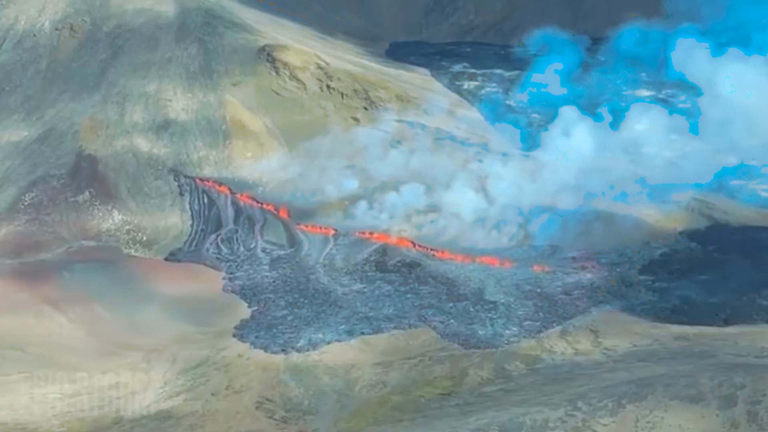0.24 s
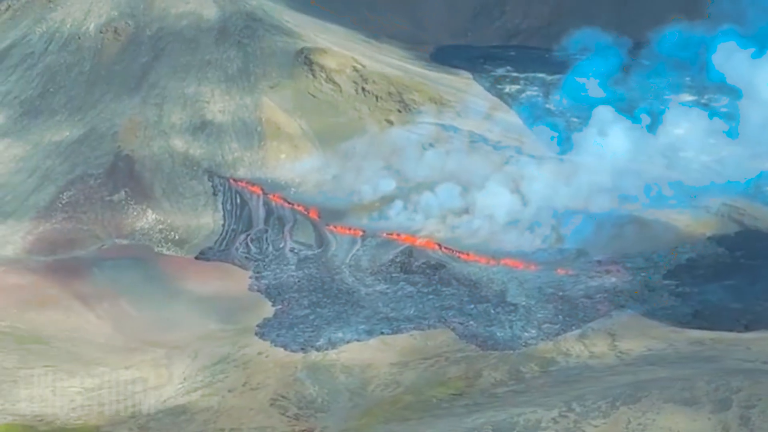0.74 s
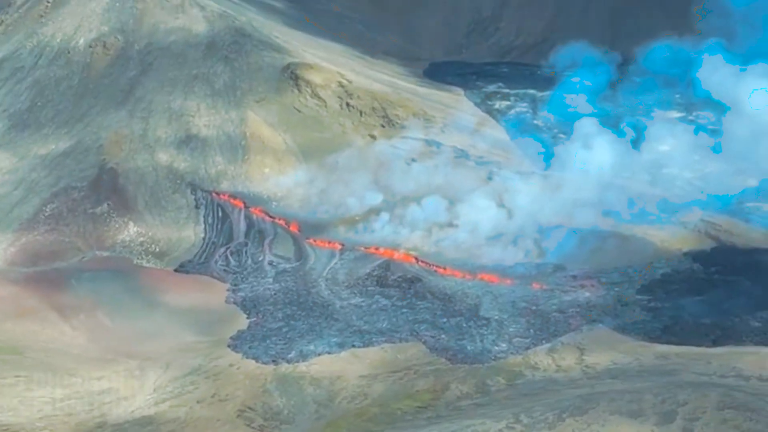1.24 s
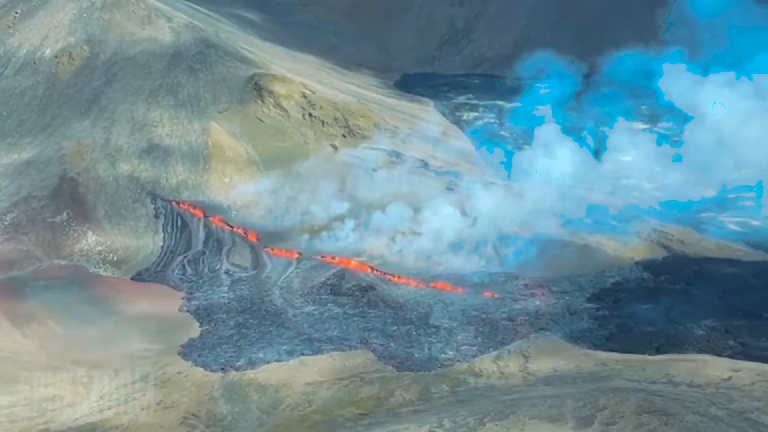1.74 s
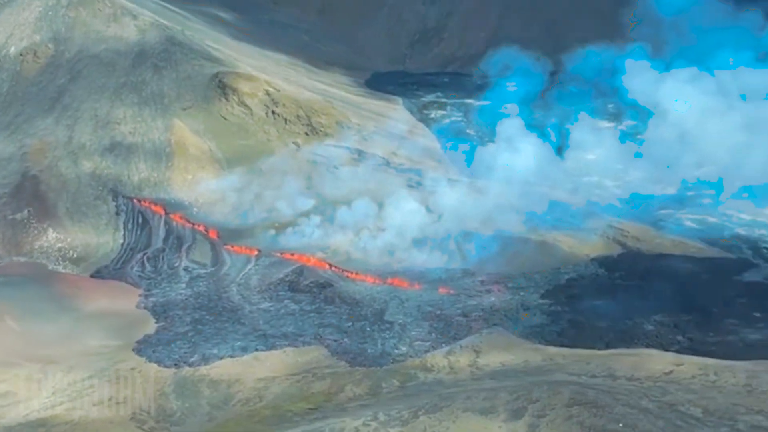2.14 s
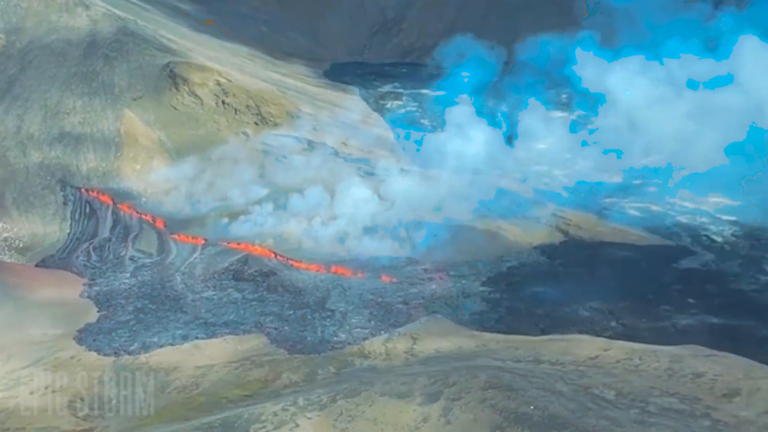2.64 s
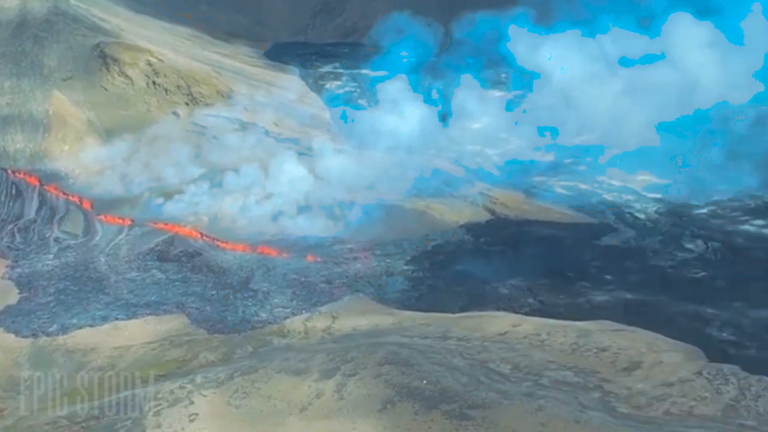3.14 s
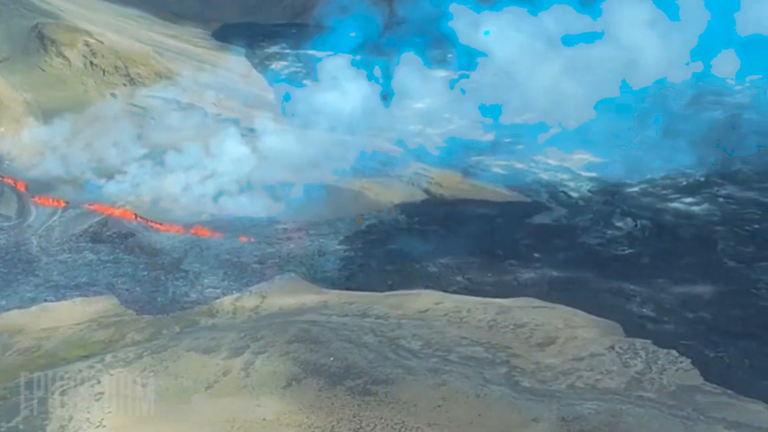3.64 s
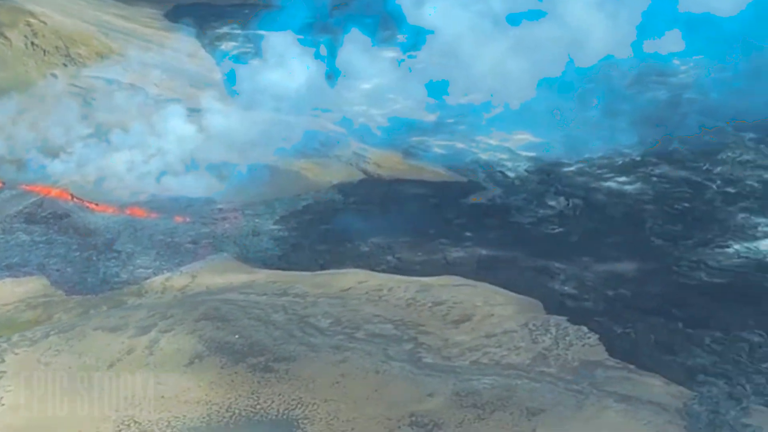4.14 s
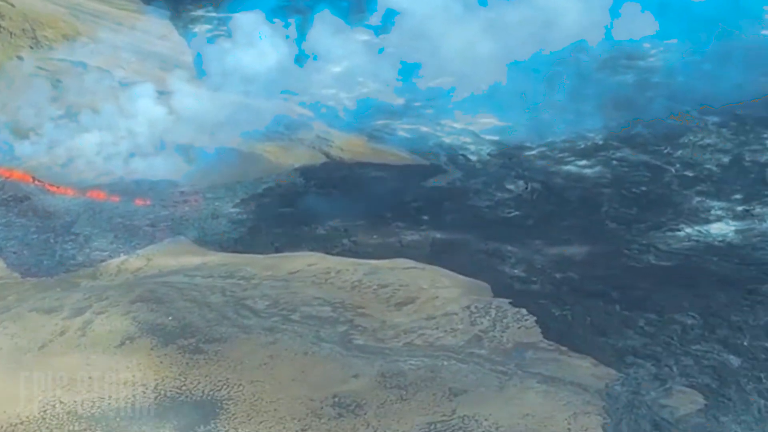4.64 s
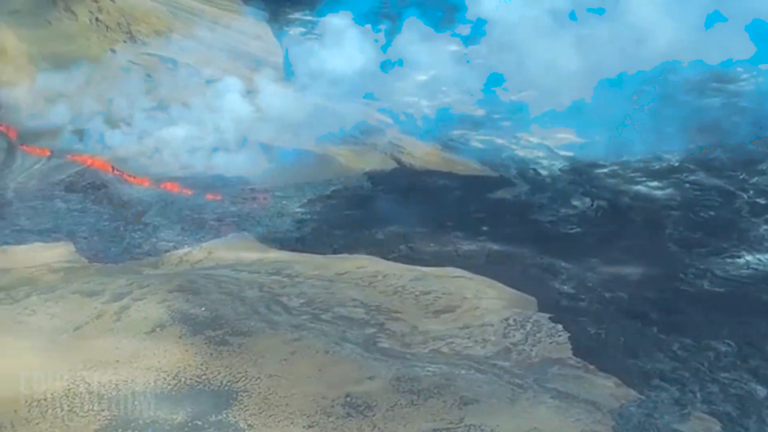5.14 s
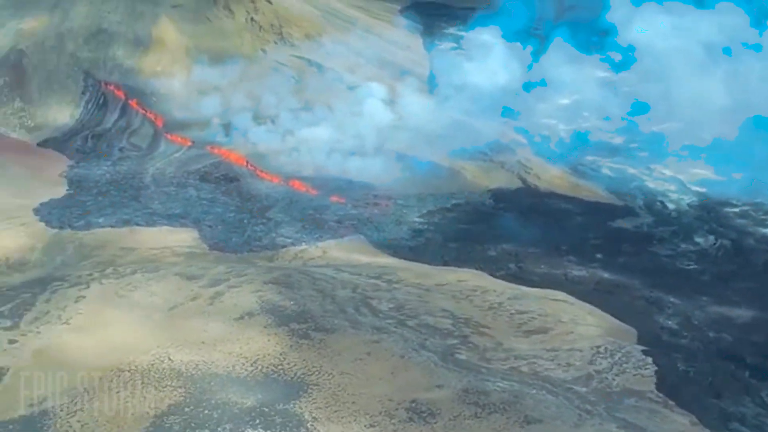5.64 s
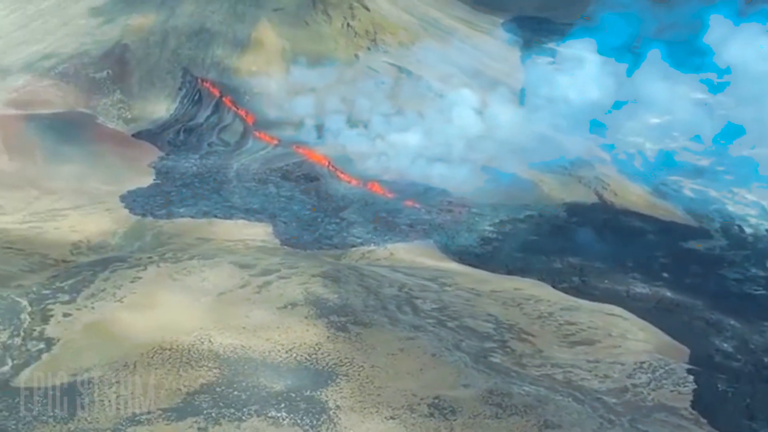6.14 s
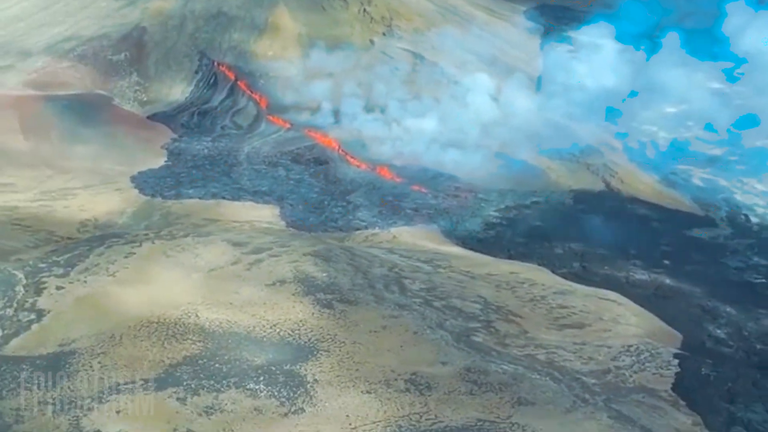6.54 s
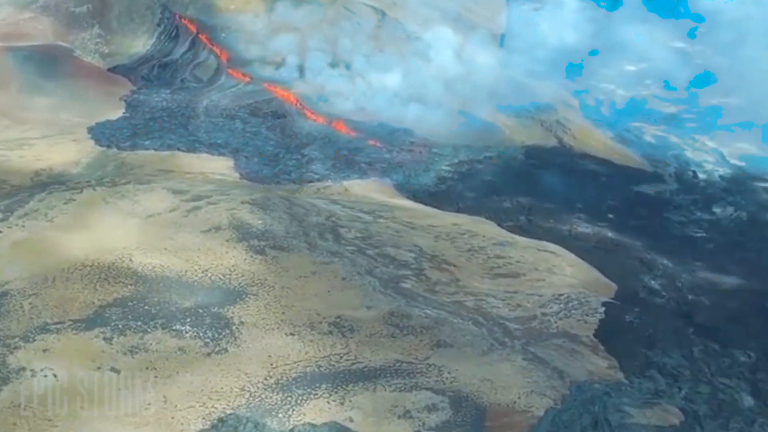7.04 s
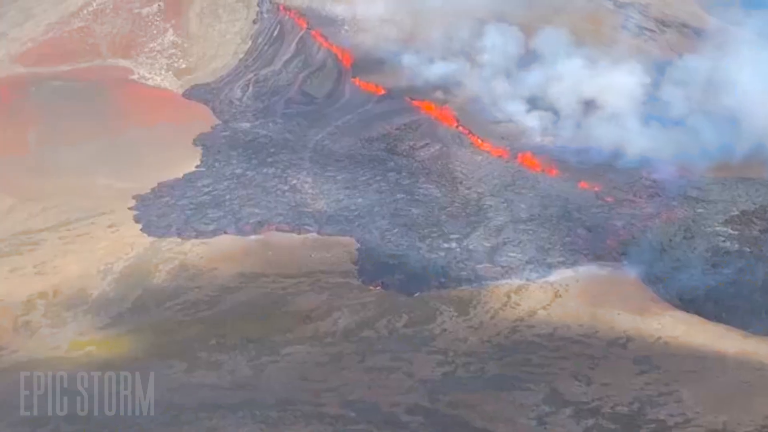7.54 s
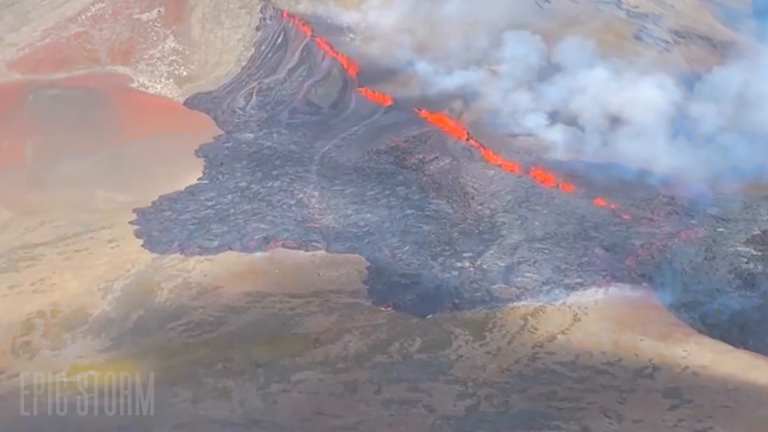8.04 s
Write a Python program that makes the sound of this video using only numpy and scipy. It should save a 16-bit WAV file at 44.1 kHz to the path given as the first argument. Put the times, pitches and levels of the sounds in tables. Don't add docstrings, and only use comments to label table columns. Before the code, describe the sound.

Inside the cabin of a small propeller plane in cruise, a loud, deep engine boom dominates, with wavering overtones and a constant rush of air over the hull. Panels hum faintly and a vent hisses, growing stronger later. Near the end the sound cuts out for an instant, then returns abruptly with the drone slightly lower and steady to the end. Close, full, slightly compressed stereo pickup.

```python
import sys
import numpy as np
from scipy import signal
from scipy.fft import rfft, irfft, next_fast_len
from scipy.io import wavfile
from scipy.ndimage import uniform_filter1d, minimum_filter1d

SR = 44100
rng = np.random.default_rng(int(sys.argv[2]) if len(sys.argv) > 2 else 0)


def natural_amplitude(level_db):
    exponent = np.asarray(level_db, float) / 20
    return 10 ** exponent


def pcm_store(signal):
    levels = np.round(np.clip(np.atleast_2d(signal), -1, 1) * 32767)
    wavfile.write(sys.argv[1], SR, levels.astype(np.int16).T)


N = 366471


def in_time(rows):
    s, *columns = np.transpose(rows)
    return [np.interp(np.arange(N) / SR, s, column) for column in columns]


def at_hz(points, hz):
    table_hz, value = np.array(points).T[:2]
    return np.interp(np.log(hz), np.log(table_hz), value)


def rms_one(x):
    return x / np.sqrt(np.mean(x ** 2) + 1e-20)


def drift(rate_hz, size=N):
    hop = 40
    r = np.exp(-2 * np.pi * hop * rate_hz / SR)
    slow = signal.lfilter([1], [1, -2 * r, r * r], rng.standard_normal(N // hop + 2002))
    slow = slow[2000:]
    return np.interp(np.arange(size) / hop, np.arange(len(slow)), rms_one(slow))


def swell(t, moment_s, db, length_s):
    return db * np.exp(-((t - moment_s) / length_s) ** 2)


# (frequency [Hz], depth [dB])
ECHO_NOTCHES = [(500, 0), (1200, 4), (2500, 8), (6000, 8), (8000, 4), (13000, 2)]


def mottled(x):
    hz, _, cells = signal.stft(x, SR, nperseg=1024)
    chance = uniform_filter1d(rng.standard_normal(cells.shape), size=2, axis=1)
    chance = rms_one(uniform_filter1d(chance, size=4, axis=2))
    depth_db = at_hz(ECHO_NOTCHES, np.maximum(hz, 1))[:, None]
    gain = natural_amplitude(depth_db * np.minimum(chance + .2, 0))
    power = uniform_filter1d(np.mean(gain ** 2, axis=(0, 2)), size=9)
    gain = gain / power[:, None] ** .5
    return signal.istft(cells * gain, SR, nperseg=1024)[1][:, :x.shape[1]]


# (frequency [Hz], level [dB per Hz])
HULL = [(25, -28), (60, -6.5), (95, 0), (200, -7.5), (400, -9), (600, -17), (900, -21), (1400, -23.5),
        (2200, -25.5), (2900, -28), (4200, -28), (6000, -33.5), (8000, -41.5), (13000, -45.5)]
HULL_AFTER = [(25, -14), (60, -17), (95, -2.5), (200, -9.5), (400, -10.5), (520, -14.5), (650, -18),
              (800, -15.5), (1200, -25), (1800, -23.5), (2500, -28.5), (4200, -30), (7000, -36),
              (13000, -43)]
# (frequency [Hz], level [dB per Hz])
HULL_SIDE = [(25, -29), (120, -34), (300, -18), (500, -16.5), (800, -18), (1300, -24), (1800, -32),
             (2500, -25.5), (4000, -31.5), (4900, -31), (6100, -42.5), (7500, -40), (10000, -40.5),
             (13000, -47)]
HULL_SIDE_AFTER = [(25, -36), (75, -24), (120, -29), (300, -18), (500, -20), (650, -19), (900, -16),
                   (1700, -28), (3000, -24), (4000, -31), (4900, -32), (5800, -39), (10000, -34),
                   (13000, -43)]
PATCH_HZ = [30, 100, 250, 600, 1300, 2300, 3500, 5000, 6500, 7800, 8700, 9500, 10300, 11100, 11900, 12800]
# (frequency [Hz], spread [dB])
COMMON_DIPS = [(1500, .5), (7200, 1.2), (8600, 9), (10000, 11.5), (11300, 8), (12500, 2.5)]
# (frequency [Hz], share [0-1, signed])
LEAN = [(200, 0.2), (400, 0.33), (750, -0.53), (1050, -.2), (1350, .3), (2100, 0.34), (2800, -0.23),
        (4000, -0.016), (7700, .3), (9500, 0)]
LEAN_AFTER = [(500, .1), (1000, -.1), (1900, .3), (3000, .3), (7700, .3), (9500, 0)]
# (frequency [Hz], share [ratio])
FOLLOWS = [(115, 0.71), (800, 0.25), (1900, 0.55), (2900, 0.033)]
FOLLOWS_AFTER = [(115, 0.55), (800, .6), (1900, -.6), (2900, 0.58)]
# (time [s], level [dB])
AIRFLOW_AFTER = [(7.5, -1.5), (8.31, 2)]
# (time [s], level [dB], length [s])
BUMPS = [
    (1.838, 1.5, 0.33),
    (3.92, 0.5, 0.6),
    (5.25, 0, .15),
]


def hull_rush(flow, follows, common, apart, apart_db, patchy_db, lean, part):
    air_db, bump_top_hz = -38, 400
    flow_db = in_time(flow)[0][part]
    flow_db = flow_db - flow_db.mean()
    t = (np.arange(N) / SR)[part]
    bump_db = sum(swell(t, *row) for row in BUMPS)
    n = len(t)
    size = next_fast_len(n, True)
    hz = np.maximum(np.arange(size // 2 + 1) * SR / size, 1)

    colour = natural_amplitude([at_hz(common, hz), at_hz(apart, hz) + apart_db])
    both, other = rfft(rng.standard_normal((2, size)))
    share = np.clip(at_hz(lean, hz), -1, 1)
    difference = 1j * share * both + np.sqrt(1 - share ** 2) * other
    spectrum = np.array([both, difference]) * colour

    gust, sway = drift(6.0, size=n), drift(30.0, size=n)
    out = 0
    for k, centre in enumerate(PATCH_HZ):
        window = np.interp(np.log(hz), np.log(PATCH_HZ), np.arange(len(PATCH_HZ)) == k)
        level_db = at_hz(follows, centre) * flow_db + bump_db / (1 + (centre / bump_top_hz) ** 2)
        level_db = level_db + patchy_db * (0.18 * gust + drift(8.6, size=n))
        dip_chance = np.minimum(.7 * (sway + drift(30.0, size=n)) + .3, 0)
        dip_db = at_hz(COMMON_DIPS, centre) * dip_chance * np.array([[1], [-.25]])
        out = out + natural_amplitude(level_db + dip_db) * irfft(spectrum * window, size)[:, :n]
    mid, side = mottled(out) * natural_amplitude(air_db) * np.sqrt(SR / 2)
    ears = np.zeros((2, N))
    ears[:, part] = mid + side, mid - side
    return ears


def narrow(x, hz, width_hz):
    r = np.exp(-np.pi * width_hz / SR)
    feedback = [1, -2 * r * np.cos(2 * np.pi * hz / SR), r * r]
    return signal.lfilter([(1 - r * r) / 2, 0, (r * r - 1) / 2], feedback, x)


# (frequency [Hz], width [Hz], level [dB rms], left over right [dB])
PANELS = [(129.7, 23, -37.5, -5), (819, 47, -37.5, 1), (922, 37, -42.5, -3), (1257, 56, -44.5, -19.5)]
PANELS_AFTER = [(125.5, 7.9, -22.5, .5), (794, 41, -32.5, 1.5), (1000, 20, -60, .5)]


def panels(modes):
    out = np.zeros((2, N))
    for hz, width_hz, level_db, pan_db in modes:
        tone = narrow(narrow(rng.standard_normal(N), hz, width_hz), hz, width_hz)
        out += rms_one(tone) * natural_amplitude(level_db + pan_db / 2 * np.array([[1], [-1]]))
    return out


# (time [s], jet level [dB], jet centre [Hz])
AIRFLOW = [(0.0, -32.5, 1794), (0.99, -31.5, 1717), (4.86, -32.5, 1869), (5.39, -30, 1866),
           (7.19, -28.5, 1842), (7.42, -30, 1890)]


def vent(curve):
    vent_db, width_hz = 0.1, 290
    level_db, centre_hz = in_time(curve)
    low = signal.butter(1, width_hz / 2, fs=SR, output="sos")
    a, b = signal.sosfilt(low, rng.standard_normal((2, N)))
    turn = 2 * np.pi * np.cumsum(centre_hz) / SR
    hiss = rms_one(a * np.cos(turn) + b * np.sin(turn))
    swell_db = .7 * (level_db - level_db.mean())
    return natural_amplitude(level_db + swell_db + vent_db + 0.28 * drift(8.6)) * hiss


# (multiple of firing rate, level [dB rms], share of the sharpness [ratio],
# left-right difference [dB rms], lead of that difference [rad])
ORDERS = [(1, -7.5, 0.0058, -42.5, 1.8), (2, -25, 0.45, -40, 0.13), (3, -20.5, 0.23, -42, 0.35),
          (4, -27.5, 0.73, -41, 0.86), (5, -30, 1.25, -36, 1.3), (6, -36, 1.03, -46, 0.33),
          (7, -41.5, 1.8, -51, 1.3)]
ORDERS_AFTER = [(1, -5, .01, -44, 1.2), (2, -30.5, 2.4, -61, 2.5), (3, -32, .5, -53, .6),
                (4, -40, .1, -48, 1.1), (6, -52, .1, -43, 0.93), (7, -35.5, .1, -34, .3),
                (9, -35, .1, -56, .3), (12, -56, .1, -57, 1.5), (14, -61, .1, -55, 1.5)]
# (multiple of firing rate, level [dB rms], left-right difference [dB rms])
QUARTERS = [(.75, -39, -66), (1.25, -31, -58), (1.75, -34, -55), (2.25, -38, -58), (2.75, -38, -60),
            (3.25, -43, -62), (3.75, -36, -60), (4.5, -42, -55), (4.75, -45, -52), (5.75, -45, -54),
            (6.5, -48, -43), (6.75, -46, -58), (7.5, -47, -51), (8.75, -49, -43), (9.5, -49, -43),
            (9.75, -53, -47), (8, -47, -36), (9, -48, -43), (10, -47, -45), (12, -52, -53)]
QUARTERS_AFTER = [(.75, -40, -62), (1.25, -28, -64), (2.25, -27, -56), (3.75, -38, -57), (4.25, -38, -58),
                  (4.75, -41, -57), (5.5, -38, -41), (5.75, -40, -48), (6.5, -41, -55), (6.75, -39, -47),
                  (7.25, -41, -53), (9.5, -46, -43), (9.75, -46, -50), (10.25, -35, -46), (10.5, -31, -43),
                  (12.25, -49, -46), (13.25, -44, -56)]
# (time [s], firing rate [Hz])
SPEED = [(0.0, 77.38), (0.74, 77.52), (1.85, 77.4), (3.34, 77.33), (4.2, 77.74), (5.5, 77.95), (6.2, 77.8),
         (7.42, 78.02)]
SPEED_AFTER = [(7.49, 73.9), (7.75, 73.9), (8.1, 74.18), (8.31, 74.15)]
# (time [s], sharpness [dB])
BITE = [(0.0, 4.5), (0.3, 4), (0.6, -7.5), (1.1, 4.5), (1.5, 1.5), (2.2, 0.5), (2.9, 4.5), (3.35, 4),
        (3.7, -10), (4.1, 0), (4.5, -3), (5.5, -5), (6.1, 0.5), (7.05, -2.5), (7.42, -2.5)]
BITE_AFTER = [(7.49, 0), (7.9, -2), (8.31, 2)]
# (time [s], multiple of firing rate, level [dB], length [s])
SWELLS = [
    (.2, 2, 4, .2),
    (1.1, 2, 4, .6),
    (4.1, 2, 7, .2),
    (1.6, 5, -8, .2),
    (1.6, 6, 6, .25),
    (5.8, 8, 12, .35),
    (6.7, 8, 9, .6),
]


def engine(speed, bite, orders, quarters, anchor_s, anchor_rad, part):
    (hz,), (bite_db,) = in_time(speed), in_time(bite)
    turn = 2 * np.pi * np.cumsum(hz) / SR
    turn = (turn + anchor_rad - turn[round(anchor_s * SR)])[part]
    n, t = len(turn), (np.arange(N) / SR)[part]

    lines = []
    for k, db, share, side_db, lead in orders:
        lines.append((round(k), db + share * bite_db[part], side_db, lead, k - .8))
    for k, db, side_db in quarters:
        lines.append((round(4 * k) / 4, db, side_db, 1.5, k / 4))

    out = np.zeros((2, N))
    for k, mid_db, side_db, lead, looseness in lines:
        unrest = looseness ** .6
        mid_db = mid_db + sum(swell(t, s, db, length) for s, order, db, length in SWELLS if order == k)
        phase = k * turn + (k - 1) * (.96 + 1.34 * (k - 1))
        phase = phase + .1 * unrest * drift(3.0, size=n)
        mid = natural_amplitude(mid_db + .6 * unrest * drift(4.0, size=n)) * np.cos(phase)
        side = natural_amplitude(side_db + 1.6 * drift(1.4, size=n)) * np.cos(phase + lead)
        out[:, part] += np.sqrt(2) * (mid + side * [[1], [-1]])
    return out


def scene():
    drop_s, return_s, fade_s = 7.4335, 7.4838, .001
    t = np.arange(N) / SR
    back = round(return_s * SR)
    first, second = slice(0, back), slice(back, N)

    air = hull_rush(AIRFLOW, FOLLOWS, HULL, HULL_SIDE, 0.27, 0.2, LEAN, first)
    air = air + panels(PANELS) + vent(AIRFLOW)
    boom = engine(SPEED, BITE, ORDERS, QUARTERS, drop_s, 2.0, first)

    air_after = hull_rush(AIRFLOW_AFTER, FOLLOWS_AFTER, HULL_AFTER, HULL_SIDE_AFTER, -2, .5, LEAN_AFTER, second)
    air_after = air_after + panels(PANELS_AFTER)
    boom_after = engine(SPEED_AFTER, BITE_AFTER, ORDERS_AFTER, QUARTERS_AFTER, return_s, 3.23, second)

    before = (boom + air) * np.clip((drop_s - t) / fade_s, 0, 1)
    tail_db = -21 - 1500 * np.maximum(t - drop_s, 0)
    tail = air * (t >= drop_s) * (t < return_s) * natural_amplitude(tail_db)
    return before + tail + (boom_after + air_after) * (t >= return_s)


def roll_off(x):
    return signal.sosfilt(signal.butter(12, 13075, fs=SR, output="sos"), x)


def record(dry):
    ceiling, release_db_per_s = .96, 65
    over_db = np.maximum(20 * np.log10(np.abs(dry).max(axis=0) / ceiling + 1e-9), 0)
    fall_db = release_db_per_s * np.arange(N) / SR
    held_db = np.maximum.accumulate(over_db + fall_db) - fall_db
    gain_db = uniform_filter1d(minimum_filter1d(-held_db, size=177), size=177)
    return roll_off(dry * natural_amplitude(gain_db))


dry = scene()
out = record(dry)
pcm_store(out)
```